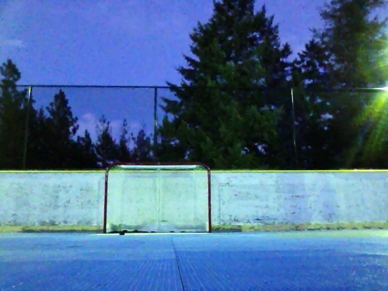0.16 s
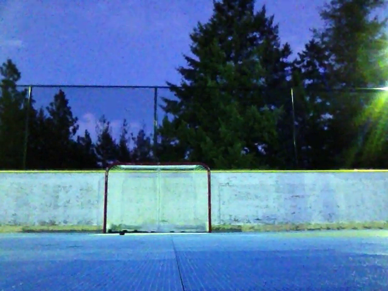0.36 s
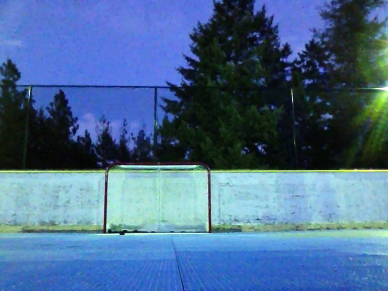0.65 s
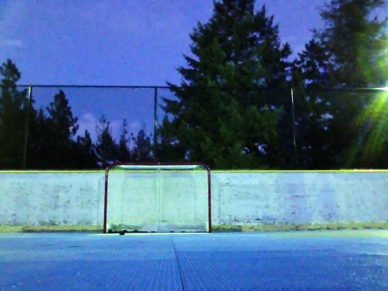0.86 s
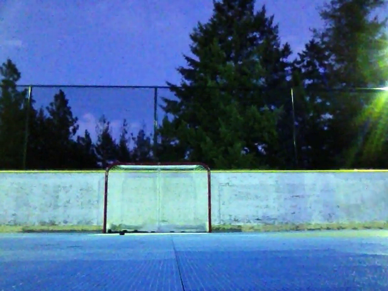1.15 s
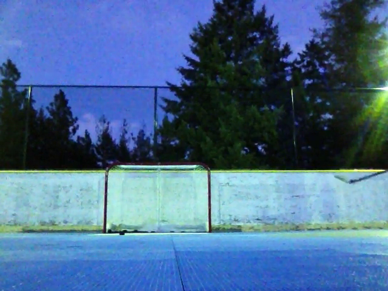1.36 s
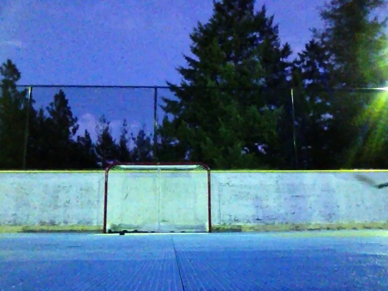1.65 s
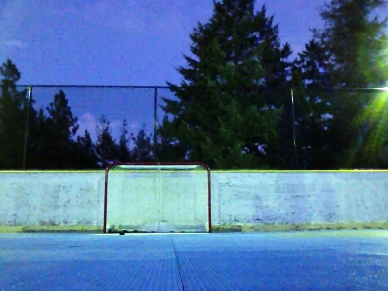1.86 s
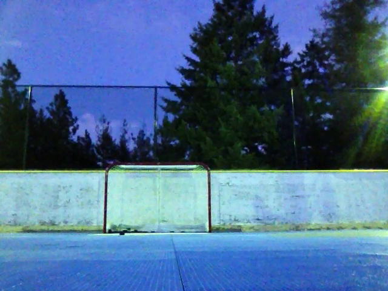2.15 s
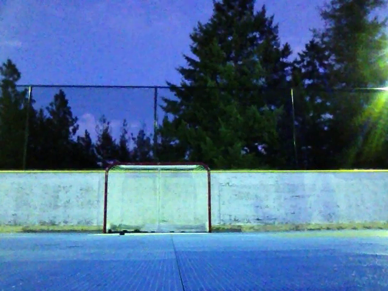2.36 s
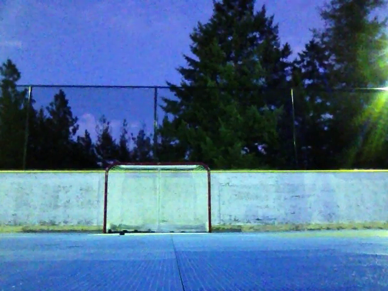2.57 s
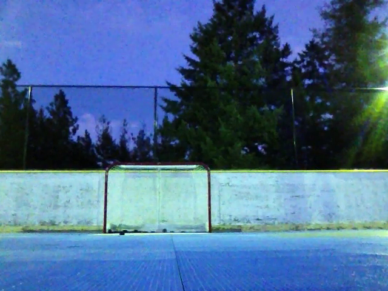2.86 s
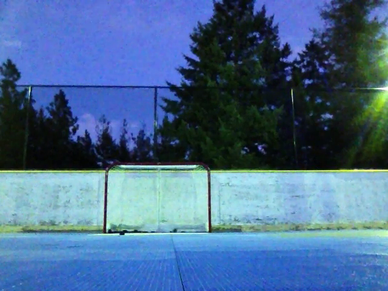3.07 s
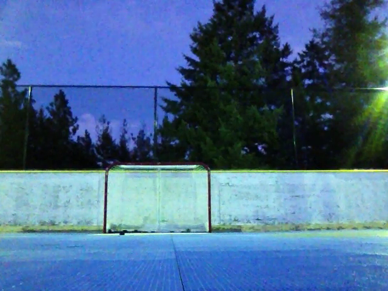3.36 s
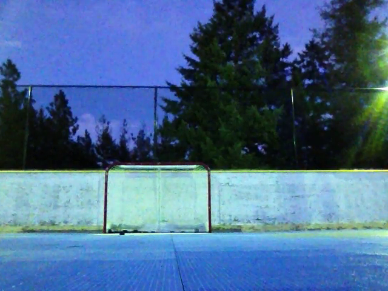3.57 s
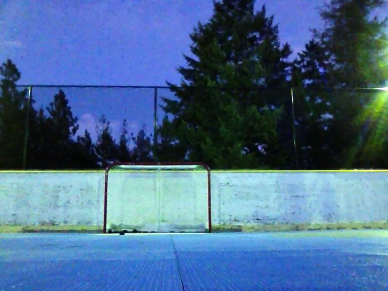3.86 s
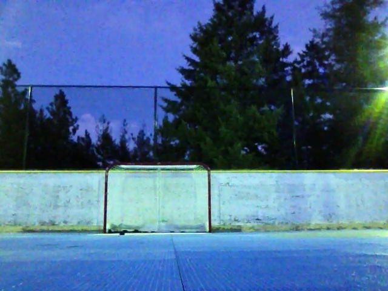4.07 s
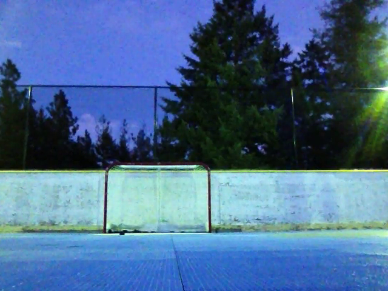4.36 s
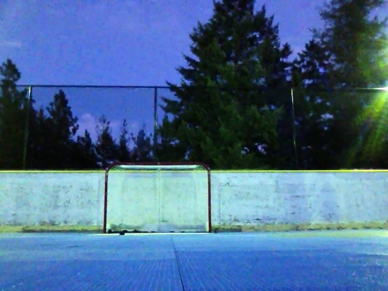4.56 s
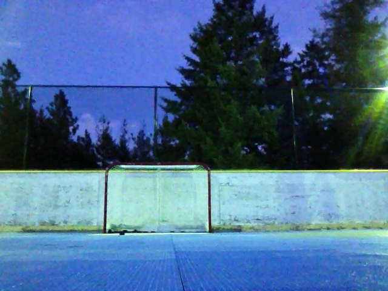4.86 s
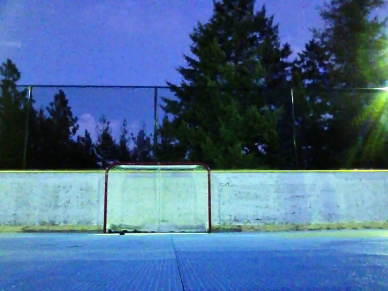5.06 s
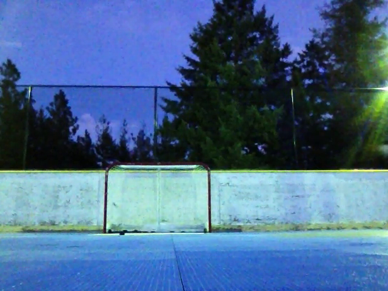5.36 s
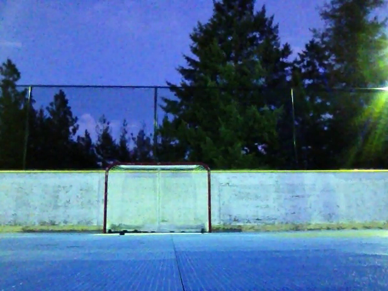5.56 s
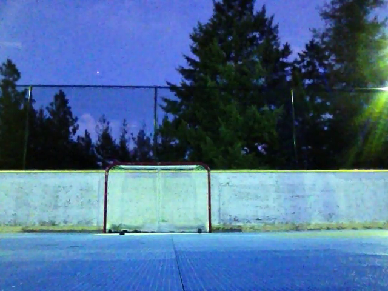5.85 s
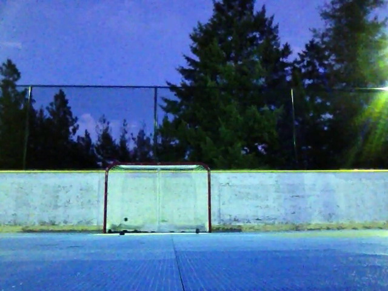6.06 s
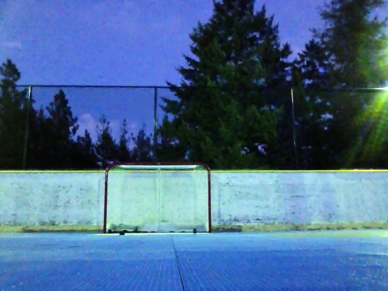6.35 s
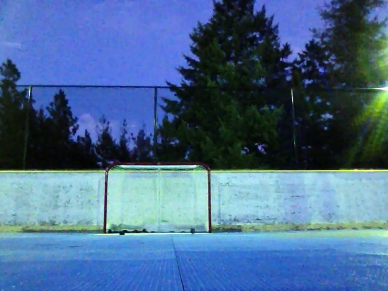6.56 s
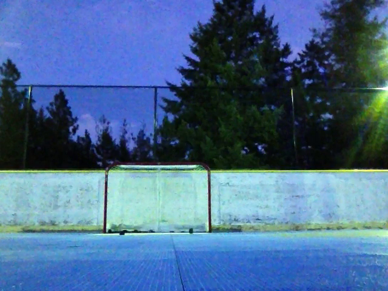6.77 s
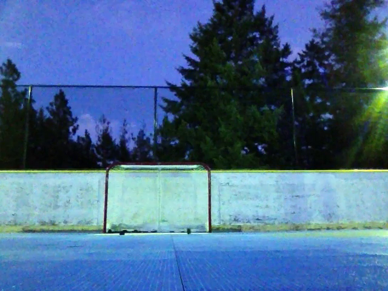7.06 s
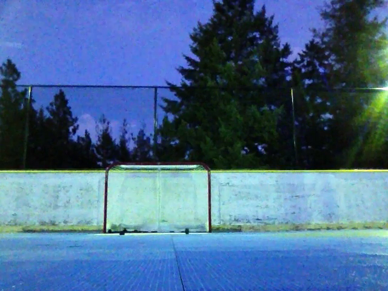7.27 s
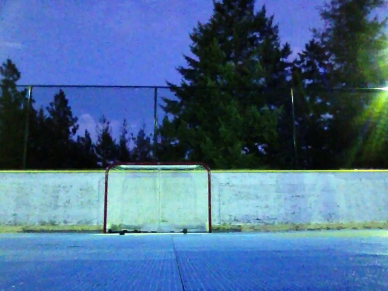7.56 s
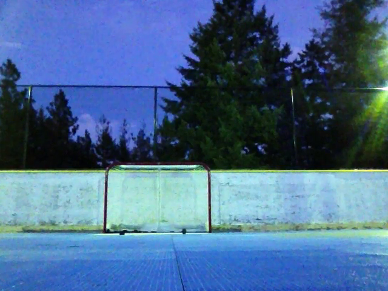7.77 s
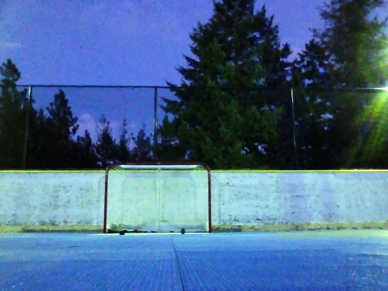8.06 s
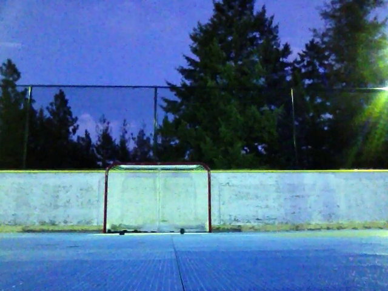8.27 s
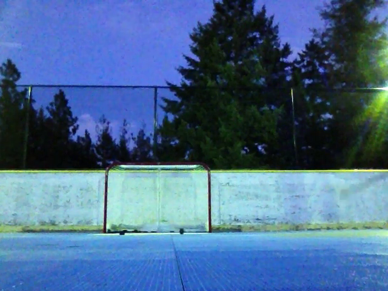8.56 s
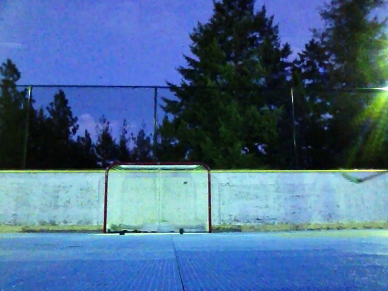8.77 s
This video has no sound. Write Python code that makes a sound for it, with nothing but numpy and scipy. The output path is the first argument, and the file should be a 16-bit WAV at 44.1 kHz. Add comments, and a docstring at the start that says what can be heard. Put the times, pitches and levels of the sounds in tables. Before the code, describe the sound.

Sharp hockey shots crack outdoors between gritty blade scrapes, the pucks ringing a metal goal frame or booming against the boards.

```python
"""Puck shooting on a tiled outdoor rink at dusk. Blade and wheels scrape from the start, over far traffic.
The stick slaps at 1.1 s; the puck rings the steel goal frame at 1.6 s. A slap at 2.9 s booms on the end
boards at 3.3 s, and a thin chirr follows. The shot at 4.9 s hits the boards, then the frame; the one at
6.6 s rings the frame at 7 s. A brief higher chirr, then a last slap at 8.4 s.
Throughout, the dragged blade squeaks now and then, and hits flutter between the side boards."""
import sys
import numpy as np
from scipy import signal
from scipy.fft import rfft, irfft, next_fast_len
from scipy.io import wavfile
from scipy.ndimage import map_coordinates

SR = 44100
rng = np.random.default_rng(int(sys.argv[2]) if len(sys.argv) > 2 else 0)


def put_to_file(sound):
    """Save the sound as 16-bit audio at rate SR, in the file named by the first command-line argument."""
    columns = np.atleast_2d(sound).T  # one column per channel
    safe = np.clip(columns, -1, 1)
    whole_steps = np.round(safe * 32767)
    wavfile.write(sys.argv[1], SR, whole_steps.astype(np.int16))


N = 393372

# Stick, puck and wheel contacts; thud, crack and click relative to the knock:
# start_s, level_db, blade_hz, thud_db, crack_db, echo_db, click_db
STICK_CONTACTS = [(0.053, -33, 1960, -12.5, -17, -13.5, -9), (0.2441, -22, 1760, -3, -36, -4.5, -10.5),
                  (0.6933, -40, 1880, -15, -22, -14.5, 18.5), (0.848, -43.5, 1640, -18, -22, -14.5, 13),
                  (1.0918, -17.5, 1990, -34, -30, -24.5, -1.5), (1.0945, -2.5, 1780, -18.5, -33, -11, -5.5),
                  (1.1367, -16, 2170, -18, -26, -15.5, 16), (1.17, -6, 2750, -19, -16.5, -15.5, 1),
                  (1.062, -52.5, 2600, -7, 12.5, -26, -3), (1.258, -45.5, 2607, -13, 16, -24, -1),
                  (1.2756, -31.5, 1814, 5, -6.5, -11, 1), (1.4297, -40, 1210, -6, -22.5, -12, 11.5),
                  (1.9526, -30.5, 1670, -12.5, -9.5, -20, 10), (2.176, -36.5, 2000, -13, -10, -5, -6.5),
                  (2.42, -30, 2200, -21, -39.5, -4.5, -6), (2.725, -45.5, 1100, -12, -21, -8, 14),
                  (2.743, -28.5, 1750, 5, -26, -20, 13), (2.795, -34.5, 2570, -11, -24, -22, 17),
                  (2.8331, -21, 1080, -19, -26, -22, 9.5), (2.9223, -4.5, 1980, -0.5, -2.5, -2, 7),
                  (2.9365, -4, 3050, -7, -13, -3, 7.5), (3.1412, -26, 3270, 1.5, -28, -25, 9),
                  (3.572, -32, 2020, -13, -12, -25.5, -14), (4.125, -54, 1300, 6, -24, -16.5, -0.5),
                  (4.1688, -48.5, 1760, -12, -19, -14, 12), (4.369, -47.5, 2050, -23, -12, -14, 13.5),
                  (4.4235, -54.5, 2700, -15, -25, -17, 11.5), (4.622, -56, 1304, -8.5, 17, -17.5, -6),
                  (4.7793, -35.5, 1370, 15, -40, -10, 17), (4.8473, -37, 1940, -15.5, -13.5, -22, 7.5),
                  (4.8536, 1, 2660, -11.5, -15, -10.5, -11), (4.857, -8, 3170, -12, -1.5, -21, 16.5),
                  (4.874, -5, 2100, -5.5, -12, -22, 7.5), (4.895, -21, 3000, 8.5, -7, -13, -9),
                  (4.905, -20, 2470, 2, -21, -6.5, -4), (4.9227, -28, 1470, 0, -15, -12, 20),
                  (4.953, -27, 1210, 6.5, -8, -11, -6), (5.2004, -31.5, 3130, -3, -18, -13, 8),
                  (5.732, -29.5, 1750, -2, -16, -19.5, -11), (5.941, -35, 1970, -0.5, -25, -15, 3),
                  (5.9767, -27.5, 2310, -21, -17, -20, 2), (6.0897, -32.5, 1380, 7.5, -47, -10, 12.5),
                  (6.0952, -35, 1100, -6, -22, -19, 16.5), (6.2509, -31, 1610, 1, -29, -14, -1),
                  (6.259, -20, 1220, -10.5, -23, -15.5, 8), (6.2646, -34, 1220, 2.5, -33, -13.5, 24.5),
                  (6.303, -31.5, 1360, -8, -36, -12, 5), (6.564, -4, 3700, -22, -24.5, -19, 2),
                  (6.5674, -7.5, 1790, -11.5, -30, -20, 6), (6.6927, -25.5, 1700, -13.5, -23.5, -28, 13.5),
                  (6.855, -21.5, 1840, 0, -17, -12, 16.5), (6.9005, -33.5, 1740, -12, -26, -12, 16.5),
                  (6.922, -35, 2300, -12, -20, -22, 13), (6.9386, -21, 3300, -14, -20, -2, -8),
                  (7.2936, -35.5, 1850, 10.5, -31, -7.5, 0), (7.8132, -31, 1680, -0.5, -10.5, -7, 10),
                  (7.9398, -33, 1710, -1, -11, -32, 14), (7.947, -47, 1500, -8, -22, -24.5, 16),
                  (8.162, -38.5, 1630, -19, -25, -22, 10), (8.441, -10, 1910, -29, -28, -33, -11),
                  (8.4448, -5.5, 1860, -13, -21, -6.5, 5.5), (8.761, -41, 2600, -20, -16, -18, 11),
                  (8.7713, -21, 2700, -23, -12, -14.5, 5), (8.7848, -26, 2360, -2, -17, -22, 13),
                  (8.888, -36, 1800, -21, -4, -10, 7)]
# Pucks on the end boards: start_s, level_db, slap_db, crack_db, base_t60_s, echo_db
PUCKS_ON_BOARDS = [(3.2790, -6, -17, -28.5, 0.053, 1), (3.297, -10.5, -24, -24, 0.029, -19),
                   (5.306, -26, 10, -12, 0.024, -1.5), (5.315, -14.5, -33, -32, 0.055, -3),
                   (5.335, -15.5, -35, -30, 0.069, -7.5)]
# End panel modes: pitch_hz, level_db
PANEL_MODES = [(170, -11), (228, -5), (267, -1), (306, 0), (420, -7), (576, -4), (724, -8), (1014, -3),
               (1228, -5)]
# Pucks on the goal frame: start_s, level_db, thud_db, crack_db, clack_t60_s, echo_db,
# tube_hz, tube_db, tube_t60_s, neighbours_db, ring_lag_s, ping_db
PUCKS_ON_FRAME = [(1.605, -13, 0, 2.5, 0.15, -7.5, 1124, -13, 0.54, -5, 0.011, -8.5),
                  (5.638, -27, 4.5, -10.5, 0.21, -4.5, 1018, 0.5, 1, -28, 0.023, -22.5),
                  (6.987, -13, 1.5, 5, 0.12, -10.5, 1059, -18.5, 0.63, 2.5, 0.011, -30)]
# High modes of the steel tube: pitch_hz, level_db, t60_s
PING_MODES = [(1994, -14, .3), (2175, -16, .25), (5464, 2, .24), (8710, -3, .22), (9267, -14, .15),
              (12786, -18, .15)]
# Bright fence echoes of a frame clack: delay_s, level_db
FENCE_ECHOES = [(0.026, -14), (0.056, -13), (.082, -11.5), (.13, -30)]
# Blade and wheel strokes; edge, rumble and hiss relative to the rasp:
# full_at_s, swell_s, hold_s, fade_s, rasp_db, edge_db, rumble_db, hiss_db
SCRAPE_STROKES = [(0.005, 0.025, 0.055, 0.39, -47.5, -8, -14, -23),
                  (0.242, 0.24, 0.011, 0.25, -40, -4, -5, -24),
                  (0.685, 0.019, 0.0061, 0.084, -58, -1, 4.5, -14),
                  (0.8, 0.022, 0.0016, 0.0308, -53.5, -6, -2, -7),
                  (0.98, 0.098, 0.014, 0.15, -30, -3, -14.5, -21.5),
                  (1.103, 0.018, 0.092, 0.11, -29.5, -0.5, -9.5, -10),
                  (1.334, 0.17, 0.12, 0.22, -49, -4.5, -0.5, -13),
                  (1.552, 0.043, 0.01, 0.21, -45.5, 2.5, -3, -19),
                  (1.923, 0.005, 0.021, 0.14, -45.5, -16, 0.5, -14),
                  (2.178, 0.36, 0.013, 0.048, -54.5, -2, -1.5, -11),
                  (2.393, 0.16, 0.06, 0.1085, -58, 3, -5.5, -10),
                  (2.772, 0.008, 0.12, 0.12, -45.5, 2.5, -4.5, -24.5),
                  (2.834, 0.086, 0.0114, 0.16, -34, -14, -5.5, -13),
                  (2.904, 0.1, 0.042, 0.044, -40.5, 8, -8, -8),
                  (2.918, .02, 0.013, 0.17, -34, -13, 1.5, -3),
                  (3.328, 0.087, 0.011, .02, -50, 11.5, -12, -0.5),
                  (3.589, 0.018, .01, 0.023, -61, 5, -10, 0),
                  (4.02, 0.0086, 0.0098, 0.16, -68, 5.5, -14.5, 1),
                  (4.184, 0.035, 0.0208, 0.057, -63, -16, 8, -15),
                  (4.326, 0.25, 0.0084, 0.067, -61, 4, -2, -5),
                  (4.687, 0.014, 0.066, 0.14, -49, -5, -1, -9),
                  (5.244, 0.0029, 0.051, 0.021, -50.5, 4.5, 1, -21),
                  (5.594, 0.015, 0.045, .02, -58.5, -11, 7, -25),
                  (5.837, 0.016, 0.051, 0.21, -60, 6.5, 3, -9),
                  (5.984, 0.012, 0.0028, 0.037, -43, -9, -3.5, -8),
                  (6.104, 0.092, 0.046, 0.16, -48, -4.5, -10, -14),
                  (6.251, 0.011, 0.18, 0.1025, -48, -10.5, 1, -51),
                  (6.499, 0.065, 0.034, 0.04, -28, -0.5, -13, -16.5),
                  (6.574, .03, 0.066, 0.071, -34, 2.5, -9, -5),
                  (6.683, 0.04, 0.0057, 0.13, -34, -32, -3, -18),
                  (6.84, 0.062, 0.0048, 0.38, -45, 3.5, 0.5, -17),
                  (6.964, 0.071, 0.0041, 0.025, -44, 4.5, -5, -4),
                  (7.223, 0.021, 0.0031, 0.053, -34.5, -4, -1.5, -11),
                  (7.281, 0.022, 0.0054, 0.16, -43.5, -8, -5, -18),
                  (7.449, 0.045, 0.074, 0.34, -53, -1, -4.5, -11),
                  (7.786, 0.079, 0.038, 0.21, -46.5, -10, -8.5, -28),
                  (7.804, .006, .03, .02, -62.5, -3, -10, -3),
                  (7.934, 0.017, 0.0031, 0.23, -52, -13, -2.5, -10),
                  (8.149, 0.015, 0.0085, 0.14, -59.5, -1, -27, -5),
                  (8.306, 0.051, 0.068, 0.096, -26, -1, -27, -25),
                  (8.466, 0.028, 0.028, 0.12, -28, 1, -5, -5),
                  (8.768, 0.018, 0.0081, 0.15, -48, 1.5, 7.5, -6),
                  (8.88, 0.027, .04, .1, -46.5, -25, -1, -10)]
# Spectra of the four scrape layers: freq_hz, density_db
RASP_SPECTRUM = [(400, -27), (700, 1), (850, 6), (1500, 4), (2000, 3), (2800, -14), (5000, -51.5)]
EDGE_SPECTRUM = [(1300, -31), (2000, 6.5), (2500, 3), (3600, -1), (4600, -10.5), (7000, -31)]
RUMBLE_SPECTRUM = [(60, -65), (130, -11.5), (300, -10.5), (650, -11), (1000, -16), (1600, -46)]
HISS_SPECTRUM = [(3000, -12.5), (5000, 4.5), (9000, -1.5), (13000, -7), (16000, -13.5)]
# Blade squeaks: full_at_s, swell_s, hold_s, fade_s, level_db, pitch_hz, glide_hz_per_s, width_ratio
BLADE_SQUEAKS = [(0.975, 0.049, .03, 0.054, -33, 2100, -4000, .3),
                 (2.914, 0.096, 0.0023, 0.0049, -29.5, 4000, 300, .3),
                 (6.129, 0.012, 0.0027, 0.039, -45, 4200, -4000, .3),
                 (6.51, .05, 0.018, .03, -32, 1350, 7000, .2), (6.515, .07, .01, .03, -34, 560, 3500, .2),
                 (6.947, 0.021, 0.0033, 0.046, -28.5, 3530, -30000, .3),
                 (8.322, 0.06, 0.065, 0.03, -30, 780, 11500, .18),
                 (8.515, 0.07, 0.0076, 0.017, -27, 4670, 22000, .45)]
# First side-board echoes, from shooting spot and goal: delay_s, level_db, repeat_ratio
SPOT_ECHOES = [(.051, 4.5, 0.82), (.088, 0.5, 1), (.131, 1, .9)]
GOAL_ECHOES = [(.051, -9.5, 0.15), (.079, -2, 0.99), (.126, -5.5, .7)]
# Rink reverberation: freq_hz, t60_s
RINK_DECAY = [(100, 1), (700, 1.03), (2000, 0.16), (6000, 0.48), (15000, 0.5)]
# Moments when ringing and echoes break off: time_s
CUTOFFS_S = [1.925, 5.6, 7.22, 11]
# Chirr contour: time_s, pitch_hz, level_db
CHIRR_CONTOUR = [(3.33, 4300, -100), (3.37, 4300, -72), (3.45, 4250, -74), (3.5, 4000, -95),
                 (3.66, 3700, -74), (3.78, 3700, -69), (3.98, 3750, -69), (4.01, 4300, -65),
                 (4.3, 4400, -65), (4.7, 4250, -65), (4.84, 4350, -67), (4.86, 4400, -110),
                 (7.84, 6900, -110), (7.89, 7000, -64), (8.04, 7000, -63), (8.13, 7100, -72),
                 (8.16, 7000, -110)]
# Far traffic and hiss: freq_hz, density_db
AIR_SPECTRUM = [(24, -44), (40, -18), (121, 1), (444, -2), (615, -4), (1550, -14.5), (3830, -18),
                (4240, -19.5), (13800, -26.5), (16000, -32)]

HIT_SAMPLES = 2 ** 16


def stick(t60_s=0.039):
    """Each contact: click, knock in the blade's resonance, thud, crack. Only the sharp head flutters."""
    track = np.zeros(N + HIT_SAMPLES)
    echoes = side_board_response(SPOT_ECHOES)
    for start_s, level_db, blade_hz, thud_db, crack_db, echo_db, click_db in STICK_CONTACTS:
        head = amp(click_db) * click(blade_hz) + burst(blade_hz, 0.73 * blade_hz, t60_s, top_hz=4400)
        head += amp(thud_db) * burst(800, 1000, 1.3 * t60_s)
        tail = 0.45 * burst(2100, 2800, 2.7 * t60_s, top_hz=4270)
        tail += amp(thud_db - 3.5) * burst(800, 1100, 2.5 * t60_s)
        tail += amp(crack_db) * burst(7400, 8300, 1.5 * t60_s, rise_s=.0015)
        add(track, start_s, amp(level_db - 5.5) * (flutter(head, echoes, echo_db) + tail))
    return track[:N]


def end_boards():
    """The panel booms in damped modes, varied per hit, and rattles on its posts; net and fence rustle."""
    track = np.zeros(N + HIT_SAMPLES)
    echoes = side_board_response(GOAL_ECHOES)
    for start_s, level_db, slap_db, crack_db, t60_s, echo_db in PUCKS_ON_BOARDS:
        boom = sum(amp(db - 0.5 + rng.normal(0, 1.77)) * ring(hz * rng.normal(1, 0.024), 1.04 * t60_s)
                   for hz, db in PANEL_MODES)
        boom += 0.99 * click(420)
        boom += 1.24 * burst(190, 630, 2.27 * t60_s) + 1.19 * burst(1150, 1050, 2.04 * t60_s)
        boom = filtered(waver(boom), lambda f: lowpass(f, 1130))
        boom += amp(crack_db) * burst(5900, 9000, 2.1 * t60_s)
        boom += amp(slap_db) * burst(1640, 1900, 4.1 * t60_s, rise_s=0.0027, top_hz=3580)
        rustle = amp(-35) * burst(2000, 2100, 1.0, rise_s=0.0065)
        add(track, start_s, amp(level_db - 4.5) * (flutter(boom, echoes, echo_db) + rustle))
    return track[:N]


def goal_frame():
    """The puck clacks on steel; the tube rings and pings, the net rustles. Returns hits, pings."""
    track, pings = np.zeros((2, N + HIT_SAMPLES))
    echoes = side_board_response(GOAL_ECHOES)
    for (start_s, level_db, thud_db, crack_db, t60_s, echo_db,
         tube_hz, tube_db, tube_t60_s, neighbours_db, ring_lag_s, ping_db) in PUCKS_ON_FRAME:
        clack = burst(1500, 1700, t60_s) + amp(thud_db) * burst(630, 560, 0.33 * t60_s)
        clack += amp(thud_db - 11.5) * burst(240, 170, 0.65 * t60_s) + amp(thud_db - 1.5) * click(560)
        crack = burst(5870, 6700, 0.95 * t60_s, rise_s=0.0013)
        for delay_s, db in FENCE_ECHOES:
            crack += amp(db) * np.roll(burst(7600, 8000, 0.48 * t60_s, rise_s=0.0048), round(delay_s * SR))
        rustle = amp(-18) * burst(2000, 3000, 0.57, rise_s=0.0076)
        hit = flutter(clack, echoes, echo_db) + amp(crack_db) * crack + rustle
        add(track, start_s, amp(level_db) * hit)
        ping = sum(amp(ping_db + db) * ring(hz, decay_s) for hz, db, decay_s in PING_MODES)
        add(pings, start_s, amp(level_db) * ping)
        neighbours = ring(.94 * tube_hz, 0.93 * tube_t60_s)
        neighbours += 1.5 * burst(0.989 * tube_hz, 0.16 * tube_hz, tube_t60_s)
        tube = ring(tube_hz, tube_t60_s) + amp(neighbours_db) * neighbours
        add(track, start_s + ring_lag_s, amp(level_db + tube_db) * tube)
    return track[:N], pings[:N]


def scrape():
    """Blade and wheels on ribbed tiles: four bands of gritty noise with a fast level jitter."""
    rasp_db, edge_db, rumble_db, hiss_db = np.transpose(SCRAPE_STROKES)[4:]
    gains = swells(SCRAPE_STROKES)

    def level(offset_db):
        return per_sample(np.sqrt(amp(2 * (rasp_db + offset_db)) @ gains ** 2))

    def grit(depth_db, spectrum):
        return coloured(rng.standard_normal(N) * amp(depth_db * rng.standard_normal(N)), spectrum)

    jitter_db = 1.3 * wobble(30) + 1.97 * wobble(120)
    rasp = level(0) * amp(jitter_db) * blade_comb(grit(4.7, RASP_SPECTRUM), gains)
    edge = level(edge_db) * amp(0.49 * jitter_db + 1.5 * wobble(60))
    edge *= blade_comb(grit(4.35, EDGE_SPECTRUM), gains)
    rumble = level(rumble_db) * amp(0.5 * jitter_db + 1.8 * wobble(21)) * grit(6.1, RUMBLE_SPECTRUM)
    hiss = level(hiss_db) * amp(1.2 * jitter_db + 1.1 * wobble(43)) * grit(6.5, HISS_SPECTRUM)
    return rasp + edge + rumble + hiss


def blade_comb(x, gains, spacing_hz=697, rise_per_s=2.5, depth=.45):
    """Evenly spaced resonances that climb through each stroke as the blade bends."""
    strokes, n = np.array(SCRAPE_STROKES), np.arange(N)
    since_s = np.arange(gains.shape[1]) / 1000 - strokes[:, :1]
    power = amp(2 * strokes[:, 4:5]) * gains ** 2 + 1e-12
    climb_s = per_sample((power * np.clip(since_s, -.15, .15)).sum(0) / power.sum(0))
    lag = SR / (spacing_hz * np.exp(rise_per_s * climb_s + 0.12 * wobble(12)))
    return unit(x + depth * np.interp(n - lag, n, x))


def squeak():
    """The dragged blade sings in a swelling, gliding band."""
    track, t = np.zeros(N), np.arange(N) / SR
    for (full_at_s, *_, db, hz, hz_per_s, width_ratio), gain in zip(BLADE_SQUEAKS, swells(BLADE_SQUEAKS)):
        near = slice(round(full_at_s * SR) - SR // 3, round(full_at_s * SR) + SR // 4)
        pitch_hz = np.clip(hz + hz_per_s * (t[near] - full_at_s), hz / 3, 2 * hz)
        track[near] += amp(db) * per_sample(gain)[near] * noise_band(pitch_hz, width_ratio * hz)
    return track


def side_board_response(first_echoes, round_trip_s=.1255, round_db=-6.5):
    """Echo spectrum between the side boards. Uneven panels smear each round; its band narrows."""
    first_spread_s, round_spread_s = .003, .008
    f = np.fft.rfftfreq(HIT_SAMPLES, 1 / SR) + 1
    delay = lambda s: np.exp(-2j * np.pi * f * s)
    dull = 1 / (1 + (f / 1350) ** 3.5) + amp(-30.5)  # treble passes over the low boards
    wall = np.abs(resonance(f, 820, 1400)) ** 2 / (1 + (f / 2600) ** 2)
    colour = wall ** 0.3 / (1 + (170 / f) ** 4)
    loop = amp(round_db) * np.abs(resonance(f, 804, 950)) ** 2
    loop = loop * delay(round_trip_s - round_spread_s / 2) * scatter(f, round_spread_s)
    response = 0
    for delay_s, db, repeat_ratio in first_echoes:
        first = amp(db) * delay(delay_s) * scatter(f, first_spread_s) * dull ** (delay_s / round_trip_s)
        response += first * colour * (1 + repeat_ratio * loop / (1 - loop))
    return response


def flutter(x, response, echo_db):
    """A hit plus its side-board echoes."""
    return x + amp(echo_db) * waver(irfft(rfft(x) * response, HIT_SAMPLES))


def waver(x, depth_s=.00035, rate_hz=70):
    """Wandering delay from shaking panels and moving air."""
    n, step = np.arange(len(x)), SR // rate_hz
    knots = rng.standard_normal(len(x) // step + 2)
    return np.interp(n + depth_s * SR * np.interp(n / step, np.arange(len(knots)), knots), n, x)


def rink_reverb(x, predelay_s=0.0055):
    """Scatter from boards, fence and trees; a new noise tail every half second and at each cutoff."""
    out = np.zeros(N + 2 * SR)
    cuts = np.round(np.array(CUTOFFS_S[:-1]) * SR)
    edges = np.unique(np.r_[np.arange(0, N, SR // 2), cuts, N]).astype(int)
    for a, b in zip(edges[:-1], edges[1:]):
        hz, t, noise = signal.stft(rng.standard_normal(SR), SR, nperseg=256)
        tail = signal.istft(noise * amp(-60 * t / log_interp(RINK_DECAY, hz)[:, None]), SR, nperseg=256)[1]
        add(out, a / SR + predelay_s, waver(signal.fftconvolve(x[a:b], tail / np.linalg.norm(tail))))
    return out[:N]


def chirr(chirps_from_s=4.005, chirps_to_s=4.76, period_s=.111):
    """A thin noise band with a fainter one above; for a while it breaks into falling chirps."""
    t = np.arange(N) / SR
    time_s, *columns = np.transpose(CHIRR_CONTOUR)
    hz, db = (np.interp(t, time_s, column) for column in columns)
    phase = np.where((t > chirps_from_s) & (t < chirps_to_s), (t - chirps_from_s) / period_s % 1, .4)
    hz *= 1 + 0.012 * wobble(30) + .16 * (.3 - np.minimum(phase, .5))
    fade_db = 10 * phase
    db += 3 * wobble(25) - fade_db
    lower = amp(db) * noise_band(hz, np.where(t > 6, 1100, 300))
    return lower + amp(db - 5 - fade_db) * noise_band(1.48 * hz, 700)


def far_traffic(level_db=-58):
    """Distant traffic and hiss, drifting in level."""
    drift_db = wobble(1.7) + wobble(22)
    return amp(level_db + drift_db) * coloured(rng.standard_normal(N), AIR_SPECTRUM)


def burst(hz, width_hz, t60_s, rise_s=0.0006, top_hz=20000):
    """Decaying noise puff through a resonance."""
    puff = rng.standard_normal(SR // 3)[:round(1.5 * t60_s * SR) + 512]
    t = np.arange(len(puff)) / SR
    if len(t) < SR // 4:  # short puffs break up
        puff *= amp(3 * np.repeat(rng.standard_normal(SR // 100), 40)[:len(t)] - 1)
    puff *= amp(-60 * t / t60_s) * (1 - np.exp(-t / rise_s))
    out = filtered(puff, lambda f: resonance(f, hz, width_hz) ** 2 * lowpass(f, top_hz))
    return np.pad(out * np.sqrt(SR / (np.pi * width_hz)), (0, HIT_SAMPLES - len(out)))


def click(hz, top_hz=4800):
    """Hard contact: one pulse through a broad resonance, peak 1."""
    out = filtered(np.eye(1, 512)[0], lambda f: resonance(f, hz, 0.71 * hz) ** 2 * lowpass(f, top_hz))
    return np.pad(out / np.abs(out).max(), (0, HIT_SAMPLES - 512))


def ring(hz, t60_s):
    """One damped mode."""
    t = np.arange(HIT_SAMPLES) / SR
    return np.sin(2 * np.pi * hz * t) * amp(-60 * t / t60_s)


def noise_band(hz, width_hz):
    """Narrow noise along a pitch curve."""
    position = np.cumsum(np.broadcast_to(width_hz, hz.shape)) / SR
    envelope = map_coordinates(rng.standard_normal(int(position[-1]) + 4), [position])
    return envelope * np.sin(2 * np.pi * np.cumsum(hz) / SR) * np.sqrt(2)


def add(track, start_s, x, fade_s=0.0036):
    """Mix x in at start_s; it ends at the next cutoff."""
    length_s = min(s for s in CUTOFFS_S if s > start_s) - start_s
    fade = np.clip((length_s - np.arange(len(x)) / SR) / fade_s, 0, 1)
    track[round(start_s * SR):][:len(x)] += x * fade


def swells(rows, swing_db=20):
    """Gain per row and millisecond; moves swing_db over each swell_s and fade_s."""
    t = np.arange(N * 1000 // SR + 2) / 1000
    full_at_s, swell_s, hold_s, fade_s = np.array(rows)[:, :4].T[..., None]
    before = np.maximum(full_at_s - t, 0) / swell_s
    after = np.maximum(t - full_at_s - hold_s, 0) / fade_s
    return amp(-swing_db * (before + after))


def wobble(rate_hz):
    """Smooth random curve."""
    knots = rng.standard_normal(int(N * rate_hz / SR) + 4)
    return per_sample(map_coordinates(knots, [np.arange(N * 1000 // SR + 2) * rate_hz / 1000]))


def per_sample(x):
    """Millisecond curve to audio rate."""
    return np.interp(np.arange(N) * 1000 / SR, np.arange(len(x)), x)


def scatter(f, spread_s):
    """All-pass with a random delay per band."""
    bands_hz = np.arange(0, SR, 90)
    lag_s = spread_s * np.interp(f, bands_hz, rng.random(len(bands_hz)))
    return np.exp(-2j * np.pi * np.cumsum(lag_s) * SR / HIT_SAMPLES)


def resonance(f, hz, width_hz):
    """Causal band-pass, peak gain 1."""
    return 1j * f * width_hz / (hz * hz - f * f + 1j * f * width_hz)


def lowpass(f, top_hz):
    """Causal four-pole roll-off."""
    return (top_hz ** 2 / (top_hz ** 2 - f * f + 1.2j * f * top_hz)) ** 2


def filtered(x, response):
    """x through a complex frequency response."""
    size = next_fast_len(len(x) + 2048)
    return irfft(rfft(x, size) * response(np.fft.rfftfreq(size, 1 / SR)), size)[:len(x)]


def coloured(x, spectrum):
    """x shaped by a spectrum, rms 1."""
    return unit(filtered(x, lambda f: amp(log_interp(spectrum, f))))


def log_interp(points, hz):
    """Read (freq_hz, value) points on a log axis."""
    freq_hz, values = np.transpose(points)
    return np.interp(np.log(hz + 1), np.log(freq_hz + 1), values)


def unit(x):
    """Scale to rms 1."""
    return x / np.sqrt(np.mean(x ** 2) + 1e-20)


def amp(db):
    """dB to gain."""
    return 10 ** (np.asarray(db) / 20)


def scene():
    """Mono mix at floor level; only the hits feed the reverb."""
    frame_hits, pings = goal_frame()
    hits = stick() + end_boards() + frame_hits
    reverb = amp(-13.5) * rink_reverb(hits)
    return (hits + pings + reverb + scrape() + squeak() + chirr() + far_traffic())[None]


def record(dry):
    """Bass cut, soft clip, coupling high-pass, band limit."""
    bass_hz, clip_level, coupling_hz, top_hz = 100, .8, 60, 15650
    x = filtered(dry[0], lambda f: (1j * f / (bass_hz + 1j * f)) ** 3)
    x = x / (1 + np.abs(x / clip_level) ** 5) ** (1 / 5)
    band_limit = lambda f: np.sin(np.pi / 2 * np.clip((top_hz - f) / 500, 0, 1)) ** 2
    return filtered(x, lambda f: 1j * f / (coupling_hz + 1j * f) * band_limit(f))[None]


dry = scene()
out = record(dry)
put_to_file(out)
```